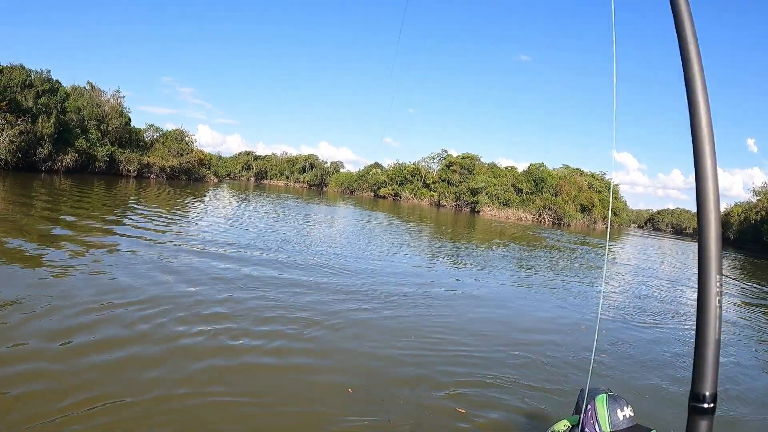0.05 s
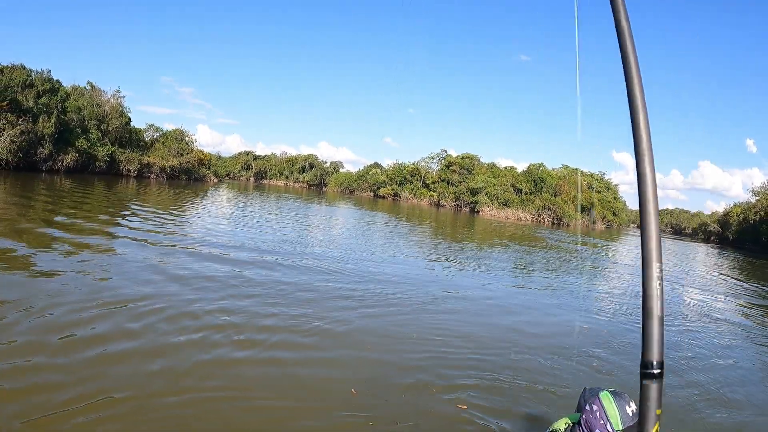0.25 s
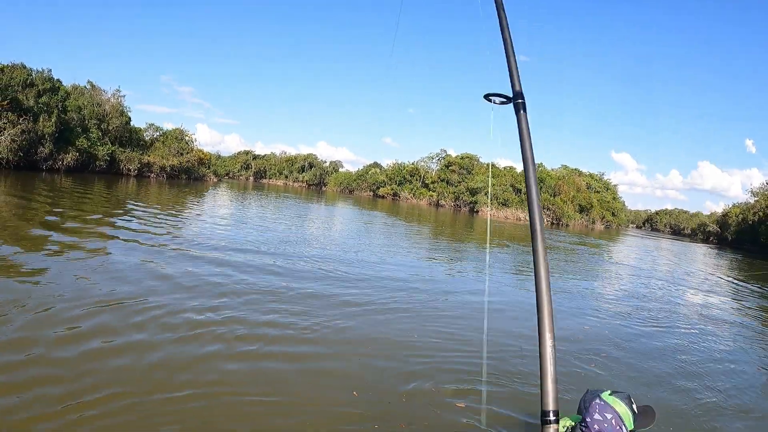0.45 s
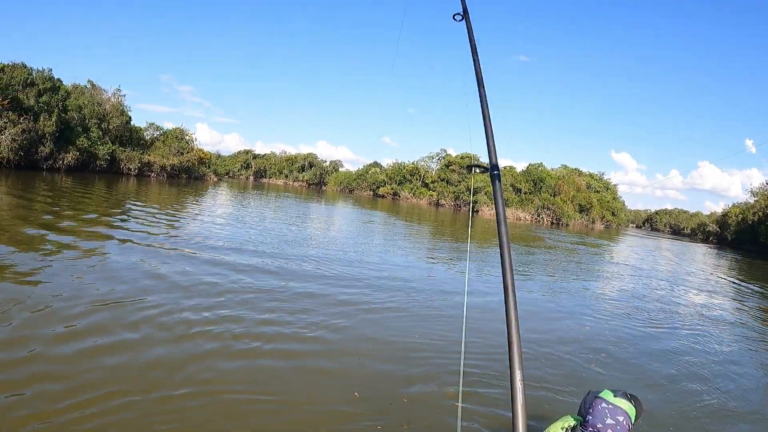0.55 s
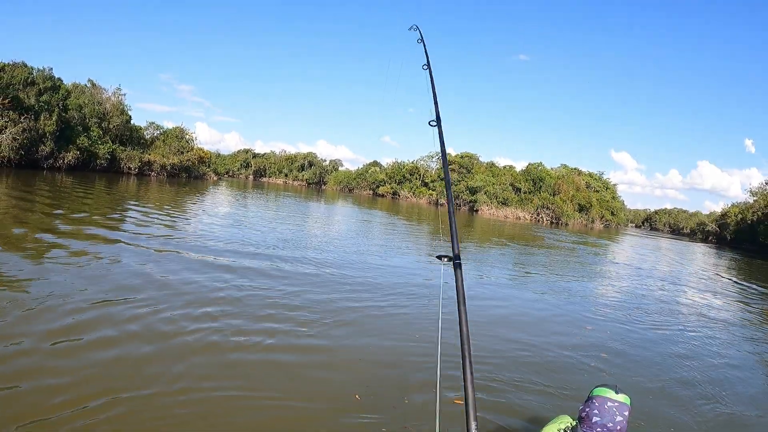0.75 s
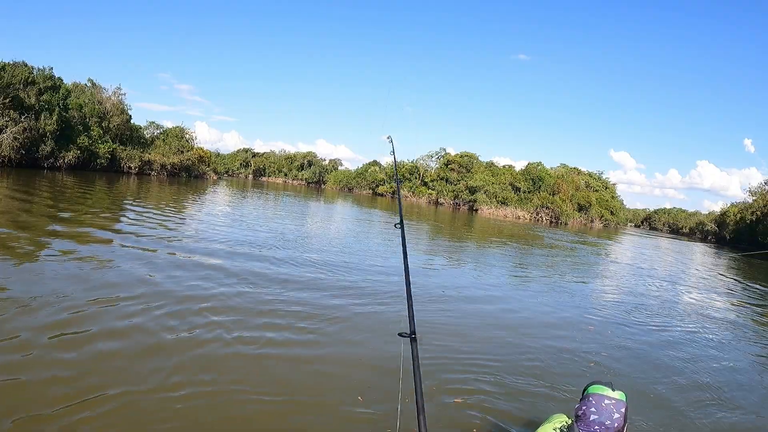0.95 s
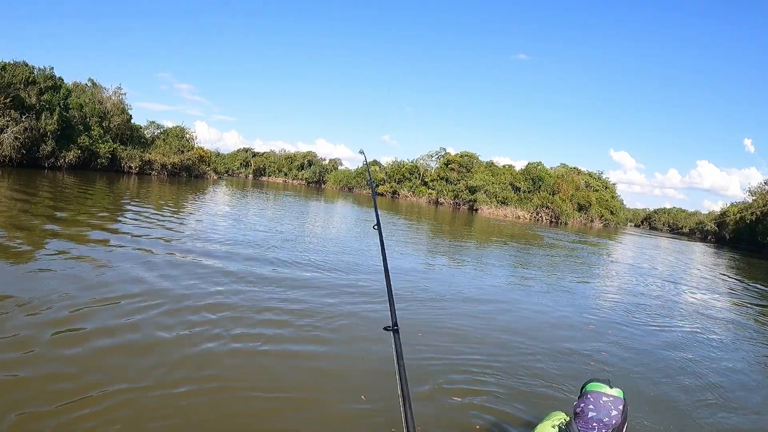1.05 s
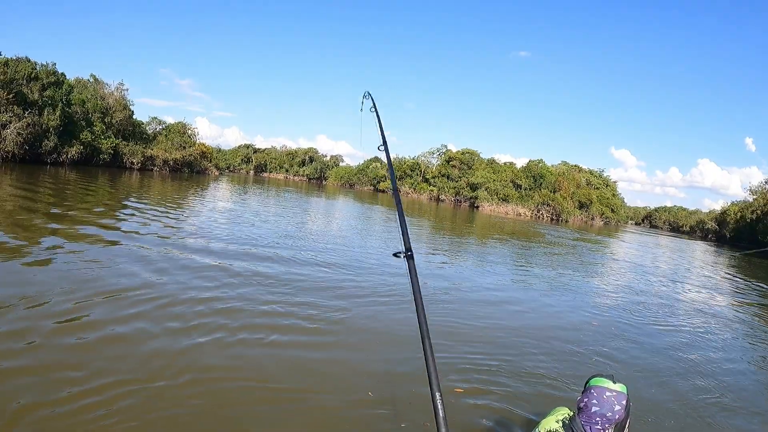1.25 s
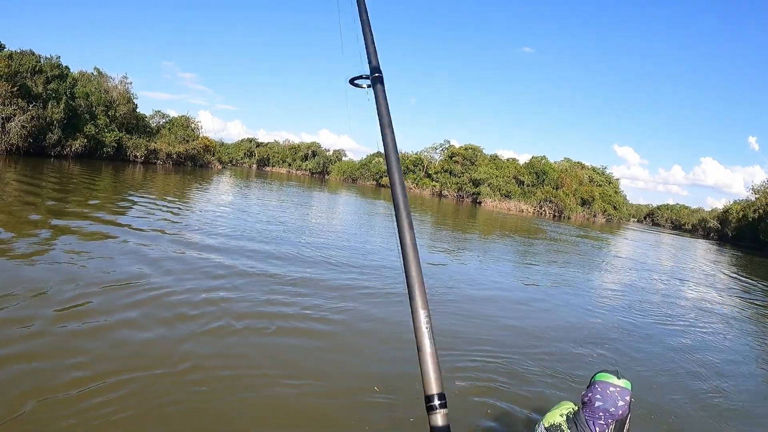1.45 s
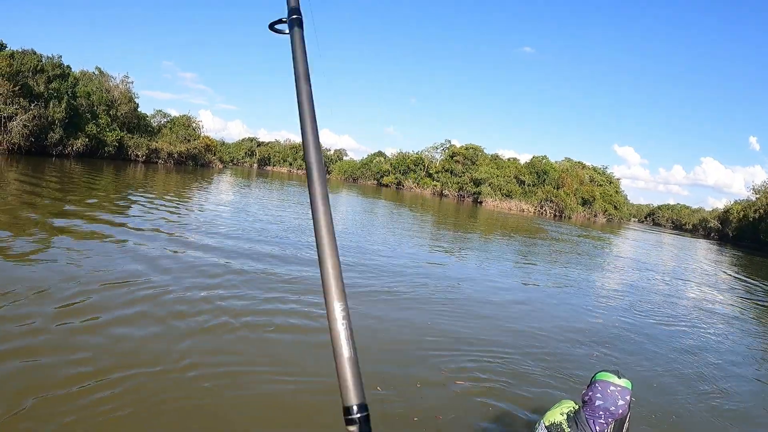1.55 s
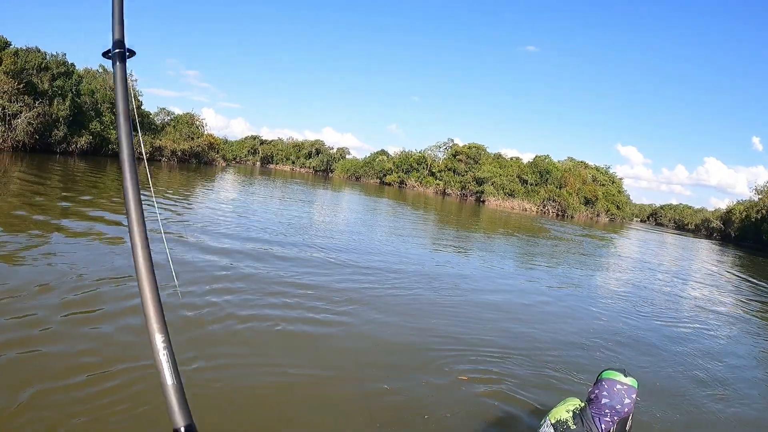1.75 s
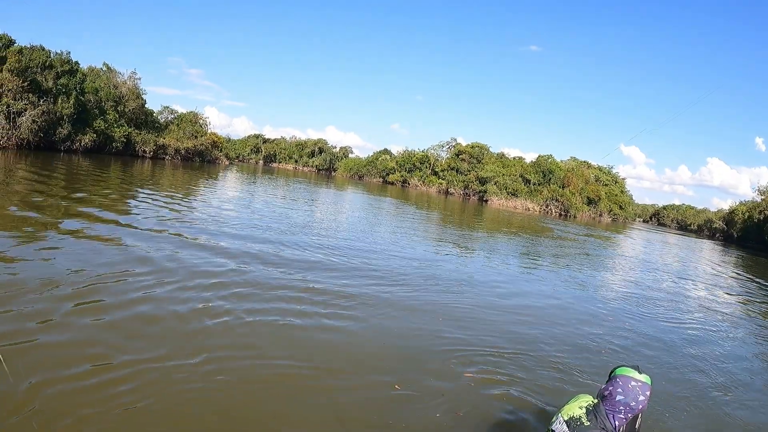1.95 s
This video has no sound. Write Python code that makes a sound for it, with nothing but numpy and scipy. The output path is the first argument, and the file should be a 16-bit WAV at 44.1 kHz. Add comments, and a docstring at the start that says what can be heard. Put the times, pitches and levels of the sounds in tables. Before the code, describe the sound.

After a small tick, a close reel clicker screams into a rough, rattling buzz, nearly stalls amid dull bumps, surges briefly and drops away, leaving light clicks, a drip and soft lapping on an open river.

```python
"""River hiss, lapping and wind on two microphone ports lie under the whole scene, as shaped noise; line scrapes.
After a tick and a faint note a fish pulls line: the drag clicker whirs up as a tone at the click rate, wavers,
stalls, runs again with a throb and winds down, while random hits ring the resonances of spool and rod.
The rod butt bumps, as short windowed tones, during the run. Small ticks, as filtered snaps, and a drip and
far birds, as gliding tones, are left when the reel has stopped."""
import sys
import numpy as np
from scipy import signal
from scipy.fft import rfft, irfft, next_fast_len
from scipy.io import wavfile
from scipy.ndimage import uniform_filter1d, map_coordinates

SR = 44100
rng = np.random.default_rng(int(sys.argv[2]) if len(sys.argv) > 2 else 0)


def linear_from_db(decibels):
    """Turn decibels (scalar or array-like) into linear amplitude factors; 0 gives 1."""
    return 10 ** (np.asarray(decibels, float) / 20)


def transcribe(signal):
    """Save signal, clipped to [-1, 1], as a 16-bit WAV file at the path in sys.argv[1]."""
    frames = np.atleast_2d(signal).T
    limited = np.clip(frames, -1, 1)
    pcm = np.round(limited * 32767).astype(np.int16)
    wavfile.write(sys.argv[1], SR, pcm)


N = 88200

# Spectrum of the river hiss. Each row: frequency in Hz, relative density in dB.
RIVER_SPECTRUM = [(500, -58), (900, -11), (1400, 0), (2300, -7.5), (3200, -10.5), (5700, -12.5),
                  (6800, -18), (7500, -14.5), (8300, -27), (10500, -26.5), (12500, -30), (15300, -57)]
# Course of the river hiss. Each row: time in seconds, level in dB.
RIVER_LEVEL = [(0, -64), (.09, -58.5), (.13, -65.5), (.2, -54), (1.36, -58.5), (1.42, -65.5), (1.47, -62.5),
               (1.65, -62), (1.69, -69), (1.73, -64.5), (1.9, -58.5), (2, -63.5)]
# Likeness of left and right in river and lapping. Each row: frequency in Hz, correlation from -1 to 1.
WATER_LIKENESS = [(60, 0.73), (150, 0.44), (380, 0.46), (950, 0.079), (2380, 0.038), (5980, 0.88),
                  (15000, 0.22)]
# Spectrum of a fine far fizz, also used for the sizzle. Each row: frequency in Hz, relative density in dB.
FIZZ_SPECTRUM = [(4500, -60), (6500, 0.5), (7600, 0.5), (8800, -4), (10300, -11), (11200, -16),
                 (12200, -13), (13500, -24), (15400, -49)]
# Course of the fizz. Each row: time in seconds, level in dB.
FIZZ_LEVEL = [(0, -101), (.2, -71), (1.39, -68.5), (1.43, -78), (1.64, -68.5), (1.7, -80), (1.73, -71.5),
              (1.92, -71.5), (1.96, -78)]
# Spectrum of water at the hull. Each row: frequency in Hz, relative density in dB.
LAPPING_SPECTRUM = [(41, -56), (70, -37), (113, -16), (172, 2), (204, -3.5), (242, -4), (440, -11),
                    (900, -16), (1170, -32), (1980, -120)]
# Course of the lapping. Each row: time in seconds, level in dB.
LAPPING_LEVEL = [(0, -57.5), (.1, -53), (.25, -59.5), (.5, -63), (.85, -61.5), (1.05, -54.5), (1.2, -61.5),
                 (1.4, -63.5), (1.6, -67.5), (1.72, -62), (1.85, -65), (2, -63)]
# Spectrum of the wind rumble. Each row: frequency in Hz, relative density in dB.
WIND_SPECTRUM = [(10, -6), (28, -9.5), (42, -8.5), (58, -45), (75, -70), (90, -120)]
# Course of the wind, mean of the two ports. Each row: time in seconds, level in dB.
WIND_LEVEL = [(0.0, -84), (0.27, -70), (0.31, -57.5), (0.56, -71.5), (0.7, -45.5), (0.87, -67), (0.9, -49),
              (1.01, -58), (1.13, -45), (1.33, -73), (1.37, -55), (1.77, -83), (1.84, -60.5), (1.89, -62),
              (1.95, -53), (2.0, -49.5)]

# Line scraping the rod rings. Each row: time in seconds, level in dB.
SCRAPE_LEVEL = [(0, -53), (.2, -53.5), (.3, -36.5), (.6, -50.5), (.93, -48.5), (.97, -46.5), (1.04, -47.5),
                (1.1, -48), (1.2, -47), (1.24, -45.5), (1.32, -43.5), (1.38, -59), (1.5, -70.5), (1.7, -71),
                (1.76, -64.5), (2, -68.5)]
# Spectrum of the scrape ahead of the resonances. Each row: frequency in Hz, relative density in dB.
SCRAPE_SPECTRUM = [(300, -83), (700, -11), (1100, 3.5), (1550, 1), (1900, -3), (2400, -8), (3500, -12),
                   (9000, -78)]
# Resonances of spool and rod. Each row: centre in Hz, width in Hz, relative peak in dB.
REEL_MODES = [(1200, 23, -9.5), (1435, 52, -0.5), (1554, 30, 3.5), (1711, 59, 2), (1894, 110, -9),
              (2050, 65, 1)]

# Ticks of tackle. Each row: start in seconds, peak in dB, centre in Hz, width over centre, left over right in dB.
TICKS = [(.097, -43, 2000, 0.38, 5), (.812, -55, 11500, .35, 2), (.907, -55, 11000, .4, 2),
         (1.038, -46, 4500, 0.43, 0), (1.053, -38.5, 2400, 0.27, 0), (1.054, -45, 7500, 0.5, 6),
         (1.091, -41.5, 5770, 0.72, 8), (1.123, -55, 9000, 0.33, 7), (1.146, -55, 9000, .4, 5),
         (1.307, -51, 7700, 0.25, 2), (1.466, -44, 1520, 0.92, 4), (1.58, -54, 6550, 0.34, 0),
         (1.746, -44.5, 1760, 0.45, -4), (1.828, -37.5, 1690, 0.4, 3), (1.828, -42.5, 4240, 0.71, 3),
         (1.828, -69, 12000, 0.18, 2), (1.949, -47.5, 1330, 0.64, 2), (1.95, -37, 4850, 0.49, 3.5),
         (1.95, -48, 7100, 0.24, 9), (1.95, -64, 11900, 0.18, 5), (1.981, -53, 4200, .8, 0)]
TICK_T60_S = 0.0085  # decay of the driving snap by 60 dB
# Far birds and a drip. Each row: start in seconds, length in seconds, first Hz, last Hz, peak in dB.
NOTES = [(0.136, 0.016, 950, 1080, -53), (1.502, 0.045, 4540, 4850, -71), (1.555, 0.019, 2340, 2400, -60.5),
         (1.6, 0.058, 3100, 3450, -67.5), (1.724, 0.0089, 1960, 2050, -57), (1.745, 0.055, 2840, 2870, -63),
         (1.78, 0.034, 7400, 7500, -65), (1.843, 0.031, 2580, 3300, -71), (1.895, .04, 7400, 7500, -64),
         (1.9, 0.042, 3600, 3830, -71), (1.958, 0.023, 1073, 1246, -54.5)]
BLUR_SCALE_HZ = 60000  # last pitch at which a note's phase drifts by one radian (rms) a sample

# The run of the reel. Each row: time in seconds, clicks per second, then levels in dB of the whine ahead of
# throb and resonance, of the rattle and of the low rasp.
RUN = [(0.16, 443.8, -52, -28, -59), (0.18, 535, -45, -69, -44), (0.238, 733.4, -38.5, -54.5, -52.5),
       (0.26, 978.4, -33.5, -47, -52.5), (0.3, 1180, -32, -41.5, -51), (0.318, 1299, -36, -38, -61),
       (0.328, 1600, -30.5, -38, -50.5), (0.36, 1650, -34, -38, -48.5), (0.39, 1773, -31.5, -39.5, -53),
       (0.418, 1533, -37, -41, -55.5), (0.45, 2000, -29.5, -42, -91), (0.494, 1975, -35, -42.5, -67),
       (0.522, 1704, -36, -41.5, -68), (0.542, 1901, -31.5, -42.5, -69), (0.576, 1867, -36.5, -42, -92),
       (0.608, 1578, -29, -42.5, -60), (0.646, 1865, -32.5, -41, -89), (0.678, 1733, -36, -44.5, -85),
       (0.698, 2113, -37.5, -39.5, -86), (0.718, 1744, -36, -46, -61), (0.746, 2050, -41, -43, -80),
       (0.77, 1786, -40, -46.5, -85), (0.792, 1950, -32, -47, -64), (0.818, 1701, -35, -46.5, -64),
       (0.85, 2002, -34, -44.5, -55.5), (0.878, 1700, -32, -43, -54), (0.94, 1538, -42.5, -47.5, -60),
       (0.998, 1557, -52, -54.5, -54), (1.082, 1361, -36, -53.5, -57.5), (1.126, 1508, -24.5, -43.5, -53),
       (1.164, 1558, -27, -44.5, -58.5), (1.23, 784, -33, -55.5, -66), (1.272, 973.5, -36.5, -50.5, -66),
       (1.316, 715, -29.5, -56.5, -55), (1.358, 644, -62, -63.5, -41.5), (1.4, 714, -65, -57, -81)]
# Evenness of the clicks. Each row: time in seconds, regular share from 0 to 1.
REGULAR_SHARE = [(.2, .35), (.42, .4), (.46, .52), (.95, .5), (1.1, .75), (1.18, .72), (1.22, .6),
                 (1.4, .62)]
# Throb of the whine. In order: start in seconds, end in seconds, rate in Hz, depth from 0 to 1.
THROB = (1.108, 1.174, 106, .85)
WANDER_HZ, WANDER_RATE_HZ = 61.4, 140  # spread of the click rate and rate of its changes
BLUR_HZ = 285  # bandwidth of the irregular part of the clicks
OVERTONE_DB, RING_SHARE = -17, .8  # second partial over first; part of the whine passing through the modes
# Spectrum of the low rasp. Each row: frequency in Hz, relative density in dB.
RASP_SPECTRUM = [(90, -84), (160, -40), (250, 7.5), (400, 3), (700, 0.5), (950, -7.5), (1300, -54)]
# Resonances of the metal spool. Each row: centre in Hz, width in Hz, relative peak in dB.
SPOOL_MODES = [(2570, 72, -1.5), (2930, 100, -3.5), (3290, 170, -3), (4160, 63, 1.5), (5080, 118, -2),
               (5410, 150, -2.5), (6320, 165, -7), (6830, 220, -7), (7670, 76, -16.5), (8750, 200, -18),
               (10110, 310, -17.5), (11700, 400, -25)]
# Spectrum of the rattle between the modes. Each row: frequency in Hz, relative density in dB.
SPOOL_BED = [(1290, -15), (2200, 3), (2740, -14), (3890, -6.5), (4190, -1), (6890, -17.5), (10300, -49),
             (15400, -78)]
SPOOL_TOP_HZ, BED_DB = 10160, -2  # roll-off of the modes; bed relative to the modes together
HITS_HZ, HIT_SCATTER_DB = 9000, 2.5  # mean hits per second and scatter of their size
SWELL_DB, SWELL_RATE_HZ = 2.5, 30  # each spool mode swells on its own
DRIFT_S, DRIFT_RATE_HZ = .0002, 18  # wandering delay that bends each mode's pitch as the spool wobbles
SIZZLE_DB = -21.5  # sparse bright clicks relative to the rattle
# Brief singing of the spool. Each row: start in seconds, length in seconds, first Hz, last Hz, peak in dB.
SINGS = [(.322, 0.049, 1796, 1780, -34.5), (.323, 0.048, 1430, 1435, -34), (.37, 0.014, 1930, 1890, -34),
         (.41, 0.021, 1410, 1330, -35), (.43, 0.036, 2080, 2037, -33.5), (.44, 0.025, 1730, 1705, -41),
         (.532, 0.08, 2050, 2016, -38), (.638, .03, 2110, 2050, -40.5), (.68, 0.024, 2100, 2062, -39),
         (.73, 0.036, 2082, 2050, -34.5), (.782, 0.0065, 2000, 2020, -33), (.862, 0.033, 1698, 1722, -34.5),
         (.93, 0.0075, 1546, 1540, -36.5)]

# Bumps of the rod butt. Each row: start in seconds, length in seconds, pitch in Hz, peak of that partial in dB,
# upper partial in Hz, upper partial relative to the first in dB.
BUMPS = [(0.912, 0.048, 144, -47.5, 304, -18), (0.934, 0.045, 140, -36, 326.4, -3),
         (0.936, 0.029, 492, -44, 396, -14), (0.957, 0.059, 96.4, -35, 384.3, -6),
         (0.979, 0.021, 767, -45.5, 618, -2), (0.99, 0.016, 196, -43, 416, -24),
         (1.025, 0.033, 101, -47, 196, -10), (1.336, 0.023, 247, -29, 418, -18.5),
         (1.363, 0.019, 235, -45, 424, -35)]
BUMP_LEAN = 0.71  # under 1: rises faster than it dies
BUMP_ROUGH = 0.12  # radians a sample scaling smoothed noise that drifts the upper partial's phase

# Place of reel and notes. Each row: time in seconds, left over right in dB.
PAN = [(0, 2.5), (.2, 0), (.35, -2), (.9, 0), (1.1, 0), (2, 2.5)]
# Phase between the ports. Each row: frequency in Hz, lead of the left in radians.
LEFT_LEAD = [(0, -0.37), (1550, -0.25), (2240, -0.74), (2930, -1.05), (5510, -0.25), (7670, -0.16),
             (8350, -0.023), (11500, 0.17), (15200, -0.1)]
RATTLE_PAN_DB = -1  # added to PAN for the rattle
WIDTH_DB, RATTLE_WIDTH_DB = -20, -11  # reflections relative to the direct sound
TOP_HZ = 15600


def unit(x):
    """Normalisation to an rms value of 1."""
    return x / np.sqrt(np.mean(x ** 2) + 1e-20)


def along(points, hz):
    """Linear interpolation of (Hz, value) points on a logarithmic frequency axis."""
    f, v = np.transpose(points)
    return np.interp(np.log(hz + 1), np.log(f + 1), v)


def curves(rows):
    """Linear interpolation in time: one value per sample for each column after the time."""
    seconds, *columns = np.transpose(rows)
    return [np.interp(np.arange(N) / SR, seconds, column) for column in columns]


def wobble(rate_hz):
    """A smooth random curve: spline interpolation through independent normal values."""
    return map_coordinates(rng.standard_normal(N // 50), [np.arange(N) * min(rate_hz, 800) / SR])


def filtered(x, response):
    """Linear filtering: the spectrum of x times a complex response of frequency."""
    m = next_fast_len(N + SR // 2)
    return irfft(rfft(x, m) * response(np.fft.rfftfreq(m, 1 / SR)), m)[..., :N]


def modes(table):
    """Modal superposition: causal second-order resonances with alternating signs."""
    def response(f):
        total = 0
        for k, (centre, width, db) in enumerate(table):
            total = total + (-1) ** k * linear_from_db(db) * 1j * f * width / (centre ** 2 - f ** 2 + 1j * f * width)
        return total
    return response


def drifting(x):
    """Doppler principle: a slowly wandering delay makes the pitch of x waver."""
    delay = DRIFT_S * SR * wobble(DRIFT_RATE_HZ)
    return map_coordinates(x, [np.arange(N) + delay], mode="nearest")


def grains(rate_hz, scatter_db):
    """Shot noise: randomly timed impulses of uneven size."""
    present = rng.random(N) < rate_hz / SR
    return present * rng.standard_normal(N) * linear_from_db(scatter_db * rng.standard_normal(N))


def rush(spectrum, likeness):
    """Partially coherent noise: mid and side are shared out to give the wanted correlation; rms 1."""
    def response(hz):
        angle = np.arccos(np.clip(along(likeness, hz), -1, 1)) / 2
        return linear_from_db(along(spectrum, hz)) * [np.cos(angle), np.sin(angle)]
    mid, side = filtered(rng.standard_normal((2, N)), response)
    return unit(np.array([mid + side, mid - side]))


def placed(x, pan_db, width_db):
    """Two-port reception: level and phase differ, and short reflections differ on each side."""
    pair = filtered(x, lambda f: np.exp(1j * np.outer([.5, -.5], along(LEFT_LEAD, f))))
    echo = rng.standard_normal((2, 900)) * linear_from_db(-60 * np.arange(900) / 900)
    echo = echo / np.linalg.norm(echo[0])
    pair = pair + linear_from_db(width_db) * signal.fftconvolve(x[None], echo, axes=1)[:, :N]
    return pair * linear_from_db(np.array([[.5], [-.5]]) * pan_db)


def river():
    """Broadband flow noise: a hiss with a fine far fizz above it."""
    level_db, = curves(RIVER_LEVEL)
    fizz_db, = curves(FIZZ_LEVEL)
    hiss = rush(RIVER_SPECTRUM, WATER_LIKENESS) * linear_from_db(level_db + wobble(9.93))
    return hiss + rush(FIZZ_SPECTRUM, [(8000, 0.91)]) * linear_from_db(fizz_db)


def lapping():
    """Low-band flow noise: water at the hull, slowly varying in level."""
    level_db, = curves(LAPPING_LEVEL)
    return rush(LAPPING_SPECTRUM, WATER_LIKENESS) * linear_from_db(level_db + 0.74 * wobble(13.26))


def wind():
    """Turbulent pressure: a largely coherent rumble, stronger on the right port."""
    level_db, = curves(WIND_LEVEL)
    return rush(WIND_SPECTRUM, [(30, 0.76)]) * linear_from_db(level_db + [[-1.5], [1.5]])


def line_scrape():
    """Friction: irregular impulses of line on rod rings excite the resonances of spool and rod."""
    level_db, = curves(SCRAPE_LEVEL)
    scrape = filtered(grains(3000, 2.5),
                      lambda f: linear_from_db(along(SCRAPE_SPECTRUM, f)) * (0.31 + modes(REEL_MODES)(f)))
    return unit(scrape) * linear_from_db(level_db + 0.48 * wobble(40.8))


def ticks():
    """Impact excitation: a decaying snap drives one broad resonance."""
    out, t = np.zeros((2, N + SR)), np.arange(SR // 20) / SR
    for start, db, hz, width, pan_db in TICKS:
        edges = [hz / (1 + width / 2), hz * (1 + width / 2)]
        band = signal.butter(2, edges, "band", fs=SR, output="sos")
        snap = (3 * (t == 0) + rng.standard_normal(len(t))) * linear_from_db(-60 * t / TICK_T60_S)
        tick = signal.sosfilt(band, snap)
        sides = linear_from_db(db + np.array([[.5], [-.5]]) * pan_db)
        out[:, round(start * SR):][:, :len(t)] += tick / abs(tick).max() * sides
    return out[:, :N]


def gliding_notes(table, edge):
    """Frequency modulation: short gliding tones blurred by phase drift; a smaller edge starts quicker."""
    out = np.zeros(N + SR)
    for start, length, first_hz, last_hz, db in table:
        u = np.linspace(0, 1, round(length * SR))
        glide = 2 * np.pi * np.cumsum(first_hz + (last_hz - first_hz) * u) / SR
        blur = last_hz / BLUR_SCALE_HZ * np.cumsum(rng.standard_normal(len(u)))
        envelope = linear_from_db(db) * abs(np.sin(np.pi * u)) ** edge
        out[round(start * SR):][:len(u)] += envelope * np.sin(glide + blur)
    return out[:N]


def running():
    """Linear onset and release of the run, from 0 to 1."""
    t = np.arange(N) / SR
    return np.clip((t - RUN[0][0]) / 0.072, 0, 1) * np.clip((RUN[-1][0] - t) / 0.055, 0, 1)


def clicker_whine():
    """Periodic excitation: clicks fast enough to fuse into a tone, partly through spool and rod modes."""
    rate_hz, whine_db, _, _ = curves(RUN)
    t = np.arange(N) / SR
    turn = np.exp(2j * np.pi * np.cumsum(rate_hz + WANDER_HZ * wobble(WANDER_RATE_HZ)) / SR)
    slow = unit(filtered(rng.standard_normal((2, N)), lambda f: 1 / (1 + (f / BLUR_HZ) ** 4)))
    regular, = curves(REGULAR_SHARE)
    size = regular + (1 - regular) * (slow[0] + 1j * slow[1])
    start, end, throb_hz, depth = THROB
    throb = 1 - depth * ((t > start) & (t < end)) * np.cos(2 * np.pi * throb_hz * (t - start))
    clicks = unit((size * (turn + linear_from_db(OVERTONE_DB) * turn ** 2)).real)
    clicks = clicks * linear_from_db(whine_db) * running() * throb
    whine = (1 - RING_SHARE) * clicks + RING_SHARE * filtered(clicks, modes(REEL_MODES))
    return filtered(whine, lambda f: 1 / (1 + (450 / (f + 1)) ** 4))  # high-pass


def low_rasp():
    """Shot noise in a low band: uneven impulses heard as a rasp during the run."""
    rasp_db = curves(RUN)[3]
    rasp = filtered(grains(2500, 4.7), lambda f: linear_from_db(along(RASP_SPECTRUM, f)))
    return unit(rasp) * linear_from_db(rasp_db) * running()


def spool_rattle():
    """Modal excitation: random hits ring each wavering spool mode, over a bed between the modes."""
    rattle_db = curves(RUN)[2]
    hits = grains(HITS_HZ, HIT_SCATTER_DB)
    ring = 0
    for mode in SPOOL_MODES:
        tone = filtered(hits, lambda f: modes([mode])(f) * (f > 1500) / (1 + (f / SPOOL_TOP_HZ) ** 6))
        ring = ring + drifting(tone) * linear_from_db(SWELL_DB * wobble(SWELL_RATE_HZ))
    # the leading point holds the bed's response at -61 dB below 1500 Hz
    bed = filtered(hits, lambda f: linear_from_db(along([(1500, -61), *SPOOL_BED], f)))
    rattle = unit(unit(ring) + linear_from_db(BED_DB) * unit(bed))
    return rattle * linear_from_db(rattle_db + 0.3 * wobble(61.7)) * running()


def sizzle():
    """Independent shot noise on each side: sparse bright clicks that follow the rattle's level."""
    rattle_db = curves(RUN)[2]
    sparks = np.array([grains(2500, 4), grains(2500, 4)])
    # the fizz spectrum tilted up by about 3.2 dB an octave
    bright = filtered(sparks, lambda f: linear_from_db(along(FIZZ_SPECTRUM, f) + 3.2 * np.log2(f / 8000 + .01)))
    return unit(bright) * linear_from_db(rattle_db + SIZZLE_DB + [[1.5], [-1.5]]) * running()


def butt_bumps():
    """Damped impact: two low partials under one lopsided window give dull soft knocks."""
    out = np.zeros(N + SR)
    for start, length, hz, db, upper_hz, upper_db in BUMPS:
        t = np.arange(round(length * SR)) / SR
        noise = uniform_filter1d(rng.standard_normal(len(t)), size=40)
        upper = np.sin(2 * np.pi * upper_hz * t + BUMP_ROUGH * np.cumsum(noise))
        tone = np.sin(2 * np.pi * hz * t) + linear_from_db(upper_db) * upper
        window = np.sin(np.pi * (t / length) ** BUMP_LEAN) ** 2
        out[round(start * SR):][:len(t)] += tone * linear_from_db(db) * window
    return out[:N]


def scene():
    """Superposition: the sounds of water, wind, reel and small events add at the two ports."""
    pan_db, = curves(PAN)
    air = river() + lapping() + wind()
    body = line_scrape() + gliding_notes(NOTES, 0.33)
    body = body + clicker_whine() + low_rasp() + gliding_notes(SINGS, 0.37)
    near = placed(body, pan_db, WIDTH_DB)
    rattle = placed(spool_rattle(), pan_db + RATTLE_PAN_DB, RATTLE_WIDTH_DB)
    return air + ticks() + near + rattle + sizzle() + butt_bumps()


def low_pass(x):
    """Removes everything above the highest recorded frequency."""
    return signal.sosfilt(signal.butter(12, 15600, fs=SR, output="sos"), x)


def record(dry):
    """Band limitation: nothing at or above TOP_HZ passes into the finished mix."""
    mix = filtered(dry, lambda hz: hz < TOP_HZ)
    return low_pass(mix)


dry = scene()
out = record(dry)
transcribe(out)
```